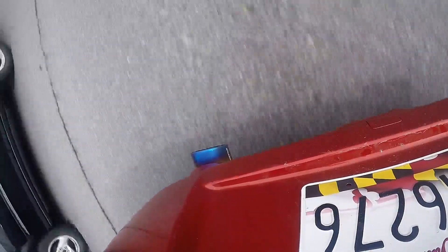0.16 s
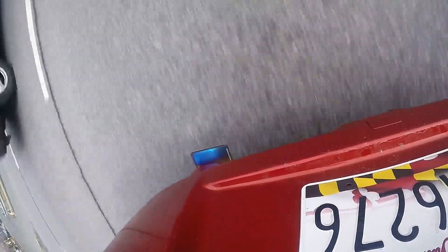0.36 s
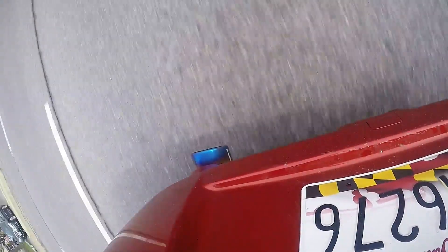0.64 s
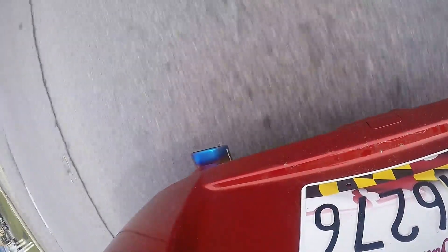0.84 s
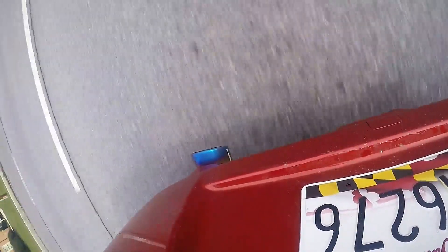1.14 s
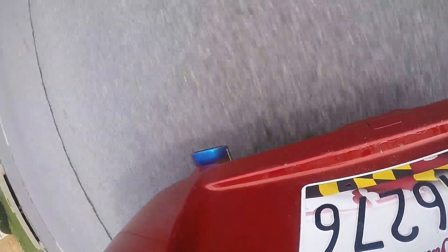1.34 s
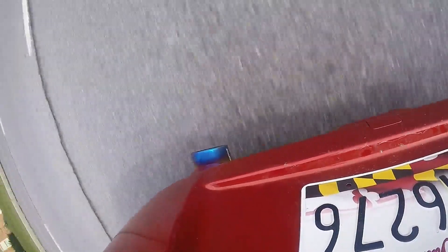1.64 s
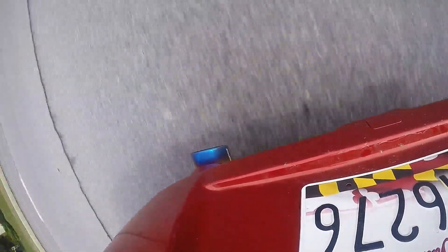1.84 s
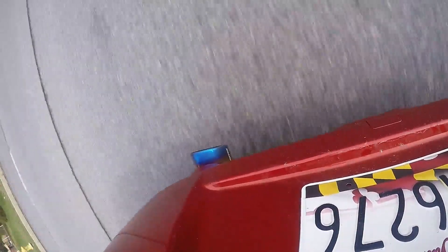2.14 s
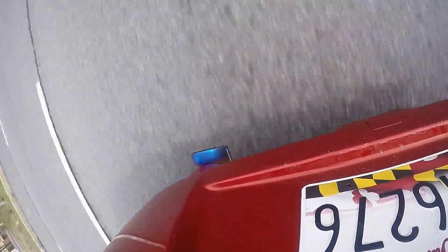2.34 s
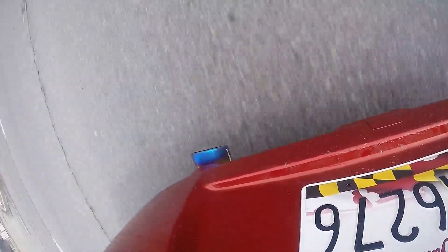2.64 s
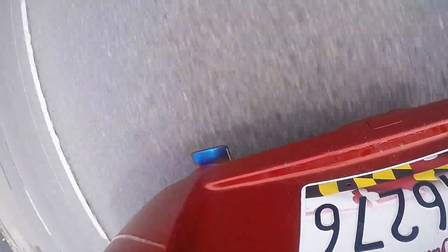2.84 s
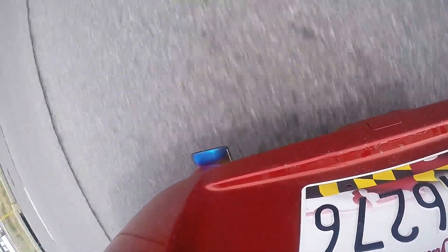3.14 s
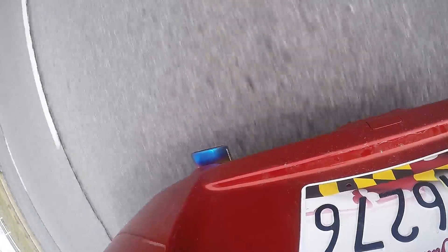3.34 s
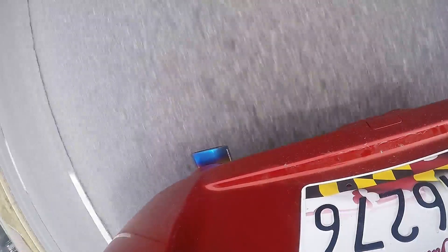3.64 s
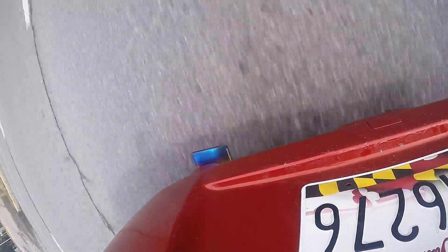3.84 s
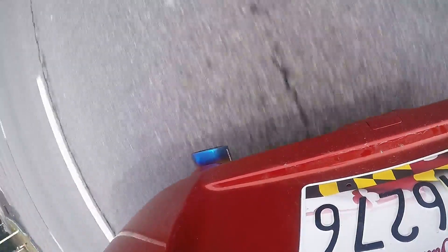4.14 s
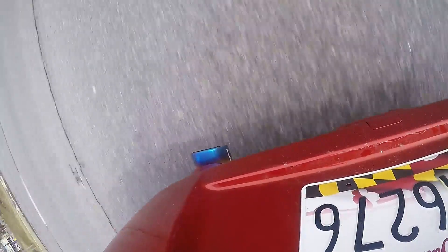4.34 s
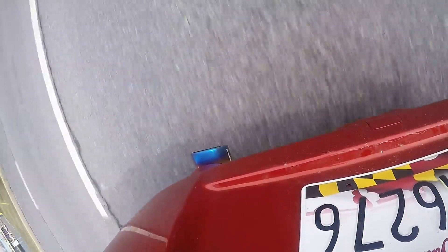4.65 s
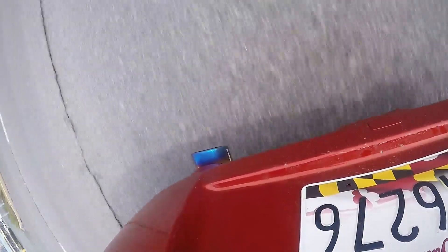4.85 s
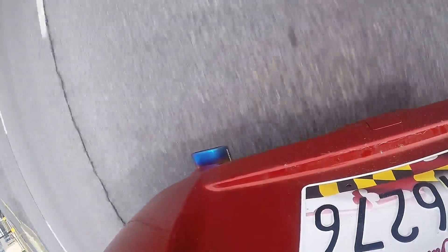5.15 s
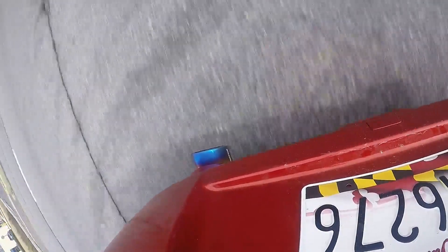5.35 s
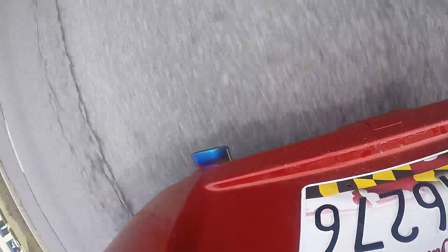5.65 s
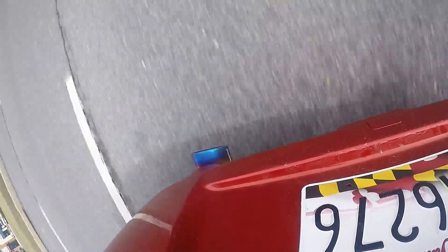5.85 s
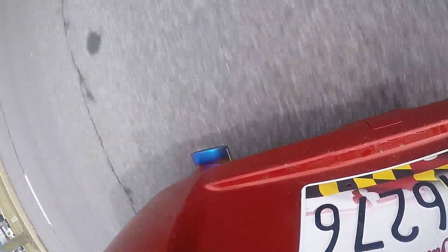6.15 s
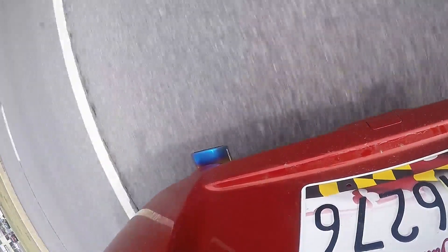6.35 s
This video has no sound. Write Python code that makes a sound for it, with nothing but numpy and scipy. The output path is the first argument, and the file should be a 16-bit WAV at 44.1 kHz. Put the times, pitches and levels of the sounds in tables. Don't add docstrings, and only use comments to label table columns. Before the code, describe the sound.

Close to the tail pipe of a six-cylinder car driving outdoors, a deep exhaust note is already easing off at the start. By about 0.4 s the tone almost vanishes, leaving a rough burble, then it catches again near 0.6 s with a stutter and a wind thump. From 0.8 to 3.3 s the car coasts: a hollow, slightly unsteady drone slowly drops in pitch while tyre roar, air hiss and lumpy wind buffeting swell back, with low thumps around 1.3, 1.5 and 2 s. A short hiccup at 3.3 s leads to the throttle biting near 3.45 s. The exhaust becomes loud, full and raspy, climbing slightly in pitch until 5.3 s, while the background is pushed down. It softens from 5.4 s, nearly disappears by 5.85 s amid wind thumps, then crackles and stumbles back around 6 s into a coasting drone until the end at 6.5 s.

```python
import sys
import numpy as np
from scipy import signal
from scipy.fft import rfft, irfft, next_fast_len
from scipy.io import wavfile
from scipy.ndimage import uniform_filter1d, map_coordinates

SR = 44100
rng = np.random.default_rng(int(sys.argv[2]) if len(sys.argv) > 2 else 0)


def to_wav(s):
    ch = np.atleast_2d(s).T
    pcm = np.round(np.clip(ch, -1, 1) * 32767)
    wavfile.write(sys.argv[1], SR, pcm.astype(np.int16))


def rack_gain(trim_db):
    fader = np.asarray(trim_db, float)
    return 10 ** (fader / 20)


N = 286209

# time in seconds, firing rate in Hz.
FIRING_RATE = [(0, 189.5), (.21, 190.5), (.36, 188.9), (.49, 188.6), (.64, 186.2), (.8, 186.9),
               (.92, 186.5), (3.12, 172.5), (3.34, 173.35), (3.6, 172.4), (4.1, 176.6), (4.9, 185),
               (5.31, 188.4), (5.5, 187.5), (5.7, 187.9), (5.84, 185.9), (6.06, 184.3), (6.49, 184.3)]
# time in seconds, level in dB.
TONE_LEVEL = [(0, -20), (.18, -26), (.27, -28.5), (.36, -47), (.56, -22.5), (.9, -19), (1.5, -16),
              (3.22, -16.5), (3.44, -17.5), (3.48, -14), (3.52, -11.5), (3.75, -11.5), (5.4, -12.5),
              (5.7, -26), (5.8, -31.5), (5.87, -36), (5.97, -21.5), (6.49, -17.5)]
# pedal down in seconds, pedal lifts in seconds, throttle shuts in seconds.
PULLS = [
    (-2, -.08, .29),
    (3.42, 5.41, 5.72),
]
# centre in seconds, half length in seconds, tone change in dB.
FUEL_CUTS = [
    (.605, 0.012, -3),
    (3.316, 0.02, -14),
    (3.407, 0.066, -6),
    (5.982, 0.0025, -7),
    (6.059, 0.013, -4),
]
# centre in seconds, half length in seconds, then changes in dB of the burble,
# of one cylinder bank alone, and of the tone.
POPS = [
    (0, 0.11, 9, 2, 3.5),
    (.42, .04, 8, -3, 10.5),
    (.575, 0.045, 0, 14, -2.5),
    (.645, 0.047, 7.5, 3, -1),
    (3.3, 0.023, 1.5, -9, 2.5),
    (3.355, 0.0093, -4, 7, 2),
    (3.47, 0.038, 6.5, 5.5, -1),
    (5.955, .022, 15.5, 3, -4),
    (6, 0.012, 7, -8, 4.5),
    (6.038, 0.024, 8, 9.5, 4.5),
]
# multiple, level coasting, level pulling, both in dB re firing tone.
CYCLE = [(3, -17.5, -20.5), (5, -10, -23.5), (7, -11, -16.5), (8, -29, -35.5), (9, -9.5, -22.5),
         (10, -25.5, -21.5), (11, -20, -19), (13, -16.5, -15), (14, -30, -41), (15, -26, -24.5),
         (17, -26.5, -25), (18, -24.5, -13), (19, -19, -20), (20, -35.5, -39), (21, -36.5, -27.5),
         (22, -42, -33), (23, -38.5, -24.5), (24, -27, -20.5), (25, -28.5, -24), (26, -37.5, -31),
         (27, -46.5, -37.5), (29, -53.5, -37), (30, -48, -27), (31, -44, -32), (32, -58, -38.5),
         (35, -43, -40.5), (36, -44.5, -44.5), (37, -47, -41), (49, -61.5, -44.5), (55, -60.5, -52)]
# frequency in Hz, width in Hz, level in dB.
PIPE = [
    (177, 19, 3),
    (263, 51, 4),
    (398, 80, -0.5),
    (577, 50, -13.5),
    (790, 270, -20.5),
]
# frequency in Hz, level in dB per Hz.
RASP = [(900, -15.5), (1150, -2), (1330, -7), (1550, -1.5), (1900, -0.5), (2100, -19), (2600, -7.5),
        (3400, -26.5), (4400, -23.5), (5000, -17.5), (5800, -28.5), (7000, -40.5)]
# frequency in Hz, level in dB per Hz.
ROAR = [(60, -19), (150, 1), (450, 1), (870, -14), (1050, -7), (1490, -13), (1800, -10.5), (2040, -17),
        (2230, -12), (2400, -16), (2670, -15.5), (3100, -21), (3500, -28), (4600, -57.5)]
# frequency in Hz, level in dB per Hz.
HISS = [(3300, -17), (3950, 0.5), (4550, -8), (5000, -8.5), (6300, -12), (7200, -20.5), (7700, -19.5),
        (8400, -26), (9500, -23.5), (11000, -30), (15500, -42.5)]
# frequency in Hz, level in dB per Hz.
BUFFET = [(2, -35.5), (8, -8), (27, 1.5), (70, -7.5), (114, -13), (200, -22), (400, -25.5), (900, -49)]
# time in seconds, level in dB.
WIND_LEVEL = [(0, -10), (.6, -12.5), (.72, -18), (.83, -12), (1.49, -15.5), (1.62, -14), (1.98, -14),
              (2.11, -11), (2.22, -23), (2.43, -10), (2.5, -16.5), (3.1, -14.5), (3.16, -22), (3.28, -12.5),
              (3.37, -18.5), (3.8, -16.5), (5.3, -12), (6.49, -13)]
# time in seconds, peak level in dB, frequency in Hz.
GUSTS = [(.195, -7, 22), (.312, -7, 25), (0.616, -2.5, 55), (1.301, -3.5, 40), (1.541, -4.5, 55),
         (1.63, -11, 35), (1.99, -8, 40), (3.317, -5, 40.2), (5.61, -10, 45), (5.741, -8, 28),
         (5.803, -15, 22), (5.863, -4.5, 28), (6.043, -2, 70)]

CRANK_START = 3.41
OPEN_S, EASE_S, SHUT_S = 0.19, .17, .15
IDLE_OPEN, EASED_OPEN = 0.12, 0.69
EASING_LEAD_S, EASING_S = 0.33, 0.36
REFIRE_S = .24
SLACK_FROM_S, SLACK_S = .8, 2.3
BUILD_WAIT_S, BUILD_S = .17, .75
STEEP_RAD, SLACK_RAD = 2.05, 1.25
OCTAVE_COAST_DB, OCTAVE_RING_DB, OCTAVE_LEAST_DB = -6, 3.5, -34.5
OCTAVE_PULL_DB, OCTAVE_YOUNG_DB, OCTAVE_LIFT_DB = -2.5, -2, -5
BURBLE_DB, BURBLE_PULL_DB, BURBLE_YOUNG_DB, BURBLE_OFF_DB = -28, -11.5, 3.5, -5
TYRES_DB = -36
DUCK_DB, DUCK_WAIT_S, DUCK_S, RECOVER_S = -13.5, 0.098, 0.11, 0.67
FIRST_DUCK = 0.85


def engine():
    (firing_hz,), (tone_db,) = curves(FIRING_RATE), curves(TONE_LEVEL)
    throttle, lift, easing, fuel_off, slack = pedal()
    pop_db, alone_db, surge_db = bumps(POPS)
    tone_db = tone_db + surge_db + bumps(FUEL_CUTS)[0]

    chamber = 1 / (1 + ((2 * firing_hz - 371) / 22) ** 2)
    coasting_db = OCTAVE_COAST_DB + OCTAVE_RING_DB * chamber
    pulling_db = OCTAVE_PULL_DB + OCTAVE_YOUNG_DB * slack
    octave_db = coasting_db + throttle * (pulling_db - coasting_db) + OCTAVE_LIFT_DB * lift
    octave_db = np.maximum(octave_db, OCTAVE_LEAST_DB - tone_db)

    burble_db = BURBLE_DB + throttle * (BURBLE_PULL_DB + BURBLE_YOUNG_DB * slack)
    burble_db = burble_db + BURBLE_OFF_DB * fuel_off + pop_db

    firing = 2 * np.pi * (CRANK_START + np.cumsum(firing_hz) / SR)
    firing = firing + (.015 + .04 * (1 - throttle)) * wobble(20)
    spread = STEEP_RAD - SLACK_RAD * slack
    tone = exhaust_tone(firing, tone_db, octave_db, throttle, firing_hz, lift, easing, alone_db, spread)
    return tone + burble(firing, burble_db) + throttle * jet_rasp(firing, tone_db)


def exhaust_tone(firing, tone_db, octave_db, throttle, firing_hz, lift, easing, alone_db, spread):
    coast = 1 - throttle
    young = throttle * (2 - spread)
    out = np.cos(firing) + rack_gain(octave_db) * np.cos(2 * firing + .3)
    for k, coast_db, pull_db in CYCLE:
        rest = k % 6
        chamber_db = 13 * coast / (1 + ((k / 6 * firing_hz - 375) / 13) ** 2)
        level_db = coast_db + throttle * (pull_db - coast_db) + chamber_db
        level_db += (.5 + 1.4 * coast) * wobble(5)
        if k == 24:
            level_db += lift * 1.1 * (-22.5 - tone_db)
        else:
            level_db -= lift * .95 * max(k - 10, 0)
        level_db += alone_db * (rest == 3) + young * young_db(k) + easing * eased_db(k)
        lag = pulse_lag(k, throttle, lift, spread)
        out += rack_gain(level_db) * np.cos(k / 6 * firing + lag)
    unsteady_db = 0.12 * coast * wobble(25) + 0.095 * wobble(9.1)
    return np.sqrt(2) * rack_gain(tone_db + unsteady_db) * out


def pulse_lag(k, throttle, lift, spread):
    whole, rest = round(k / 6 - .01), k % 6
    lag = (whole > 1) * (.3 + spread * min(whole - 2, 2) + STEEP_RAD * max(whole - 4, 0))
    if rest == 3:
        lag = lag + 2.3 + 1.8 * (1 - throttle) - .7 * (k == 3)
        lag = lag - (k > 3) * (2.5 * lift + 1.2 * throttle * (2 - spread) ** 2)
    elif rest:
        lag = lag + 1.85 + (.05 + .3 * whole) * np.sign(3 - rest) + .4 * (whole > 2) * (2 - spread)
        if whole < 4:
            lag = lag + .9 * ((rest == 4) - (rest == 2))
        else:
            lag = lag + 1.3 * (rest == 2) + .9 * (k in (22, 29))
    return lag


def young_db(k):
    if k > 27:
        return -1 if k > 30 else -9
    if k in (14, 20):
        return 12
    if k > 24:
        return 0
    if k > 20 and k % 6 > 2:
        return -4
    return 2.5 if k % 6 else -2.5


def eased_db(k):
    if k % 6 == 3:
        return -7
    if k == 30:
        return -6
    if k in (8, 14):
        return 10
    if k % 6 == 1:
        return 3.5
    return -3 if k > 20 and k % 6 else 0


def burble(firing, level_db):
    at = np.flatnonzero(np.diff(np.floor(firing / (2 * np.pi))))
    draw = rng.standard_normal((len(at), 2))
    kicks = np.zeros(N)
    kicks[at] = draw[:, 0] * rack_gain(draw[:, 1])

    def pipe(f):
        total = 0
        for i, (hz, width, db) in enumerate(PIPE):
            damping = 1j * f * width
            total = total + (-1) ** i * rack_gain(db) * damping / (hz * hz - f * f + damping)
        return total / (1 + 1j * f / 900) ** 3

    return rack_gain(level_db) * unit(filtered(kicks, pipe))


def jet_rasp(firing, tone_db):
    puffs = (1 + .7 * np.cos(firing + 2.5)) * (1 + .6 * np.cos(firing / 6 + 1))
    return rack_gain(tone_db - 43.5) * puffs * rush(RASP, patchy_db=-2.5)


def pedal():
    throttle, lift, easing, fuel_off = IDLE_OPEN, 0, 0, 0
    for down, up, shut in PULLS:
        still = 1 - ramp(shut, SHUT_S)
        lifted = ramp(up, EASE_S)
        throttle = throttle + still * ((1 - IDLE_OPEN) * ramp(down, OPEN_S) - (1 - EASED_OPEN) * lifted)
        lift = lift + still * lifted
        easing = easing + still * ramp(up - EASING_LEAD_S, EASING_S)
        fuel_off = fuel_off + ramp(shut, SHUT_S) - ramp(shut + REFIRE_S, .05)
    built = ramp(PULLS[1][0] + BUILD_WAIT_S, BUILD_S)
    slack = ramp(SLACK_FROM_S, SLACK_S) * (1 - built) ** 1.5
    return np.clip(throttle, 0, 1), lift, easing, fuel_off, slack


def tyres(duck_db):
    return rack_gain(TYRES_DB + duck_db + 8.5 + .5 * wobble(5.2)) * rush(ROAR, patchy_db=0.6)


def air_hiss(duck_db):
    return rack_gain(0.73 * (TYRES_DB + duck_db) - 29.5 + 0.27 * wobble(11)) * rush(HISS, patchy_db=1.5)


def buffeting(duck_db):
    level_db = curves(WIND_LEVEL)[0] + 0.92 * duck_db
    return rack_gain(level_db - 0.95) * unit(rack_gain(1.2 * wobble(9)) * rush(BUFFET, patchy_db=1.5))


def gust_thumps():
    t = np.arange(N) / SR
    out = np.zeros(N)
    for s, db, hz in GUSTS:
        cycles = (t - s) * hz
        out -= rack_gain(db - 5.5) * np.sin(2 * np.pi * cycles) * np.exp(-(cycles / 0.63) ** 2)
    return out


def ducking():
    t = np.arange(N) / SR
    depth = 0
    for share, (down, up, _) in zip((FIRST_DUCK, 1), PULLS):
        fall = 1 - np.exp(-np.maximum(t - down - DUCK_WAIT_S, 0) / DUCK_S)
        depth = depth + share * fall * np.exp(-np.maximum(t - up, 0) / RECOVER_S)
    return DUCK_DB * depth


def rush(spectrum, patchy_db):
    z = signal.stft(rng.standard_normal(N + 512), nperseg=512)[2]
    field = uniform_filter1d(rng.standard_normal(z.shape), size=6, axis=0)
    field = uniform_filter1d(field, size=12, axis=1)
    noise = signal.istft(z * rack_gain(patchy_db * unit(field)), nperseg=512)[1][:N]
    hz, db = np.transpose(spectrum)
    return unit(filtered(noise, lambda f: rack_gain(np.interp(np.log(f + 1), np.log(hz), db, -120, -120))))


def filtered(x, response):
    m = next_fast_len(N + SR // 2)
    return irfft(rfft(x, m) * response(np.fft.rfftfreq(m, 1 / SR)), m)[:N]


def unit(x):
    return x / np.sqrt(np.mean(x ** 2) + 1e-20)


def wobble(rate):
    return map_coordinates(rng.standard_normal(int(N * rate / SR) + 4), [np.arange(N) * rate / SR])


def curves(rows):
    s, *cols = np.transpose(rows)
    return [np.interp(np.arange(N) / SR, s, c) for c in cols]


def bumps(rows):
    t = np.arange(N) / SR
    return sum(np.outer(row[2:], np.exp(-((t - row[0]) / row[1]) ** 4)) for row in rows)


def ramp(start, length):
    return np.clip((np.arange(N) / SR - start) / max(length, .01), 0, 1)


def scene():
    duck_db = ducking()
    background = tyres(duck_db) + air_hiss(duck_db) + buffeting(duck_db) + gust_thumps()
    return (engine() + background)[None]


def low_pass(x):
    return signal.sosfilt(signal.butter(12, 15700, fs=SR, output="sos"), x)


def record(dry):
    soft = dry / (1 + np.abs(dry / 0.94) ** 8) ** (1 / 8)
    return low_pass(soft)


dry = scene()
out = record(dry)
to_wav(out)
```